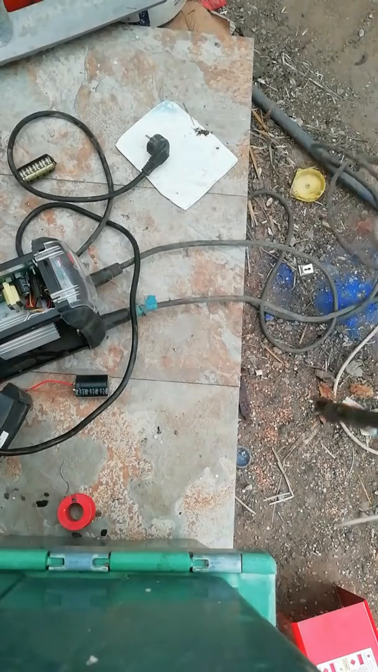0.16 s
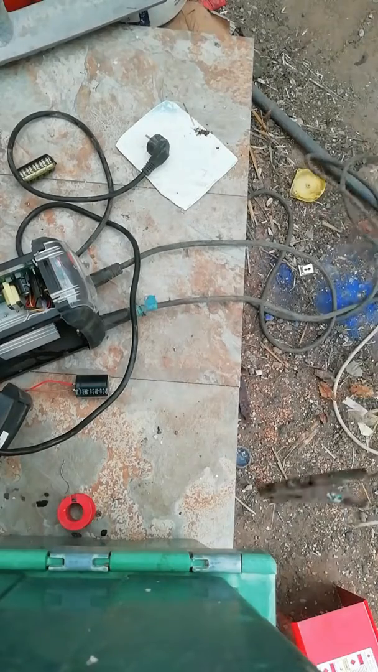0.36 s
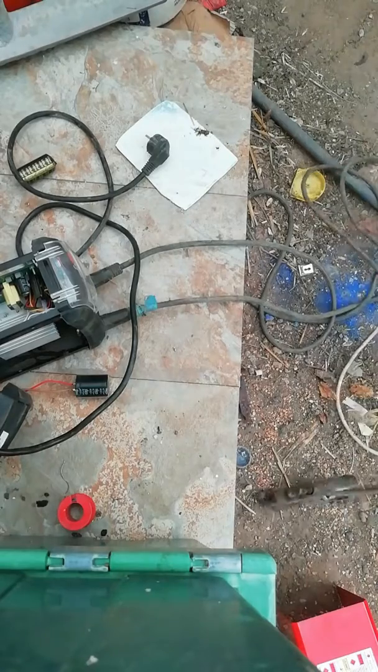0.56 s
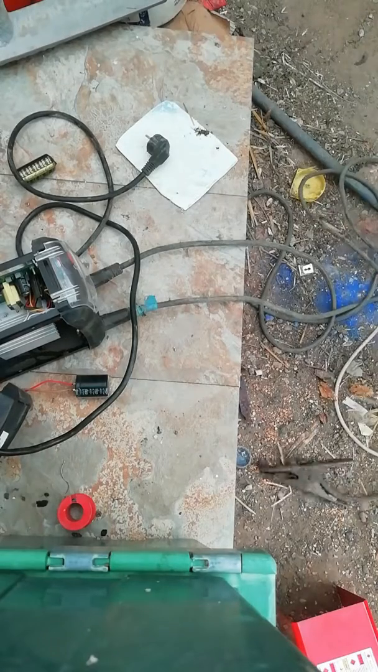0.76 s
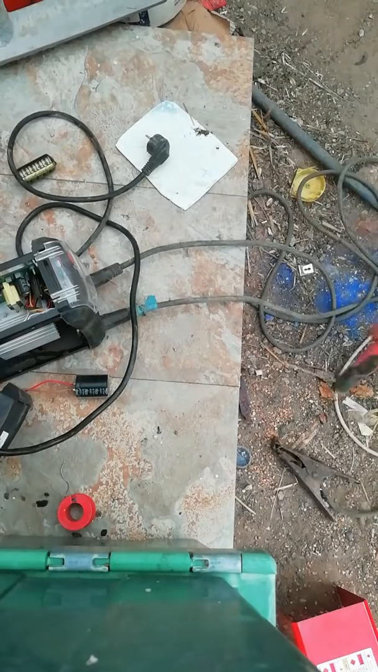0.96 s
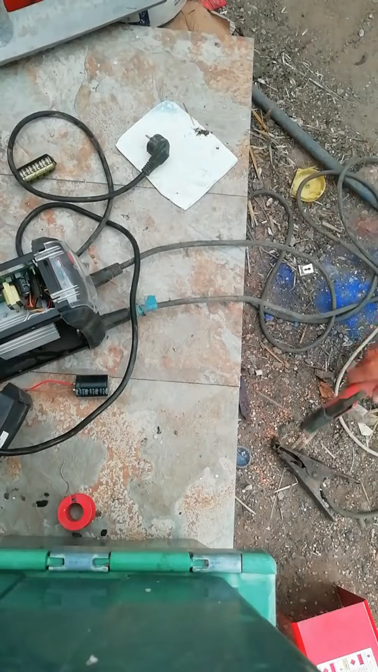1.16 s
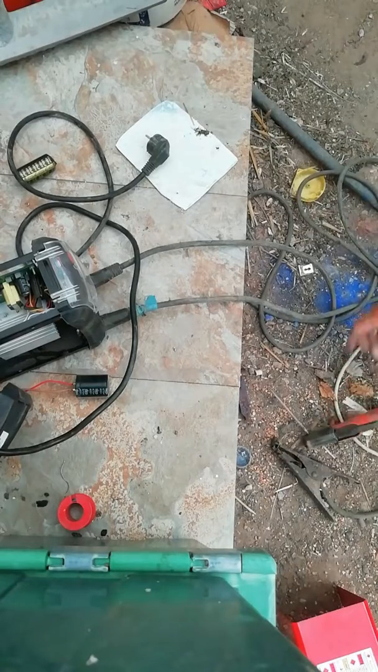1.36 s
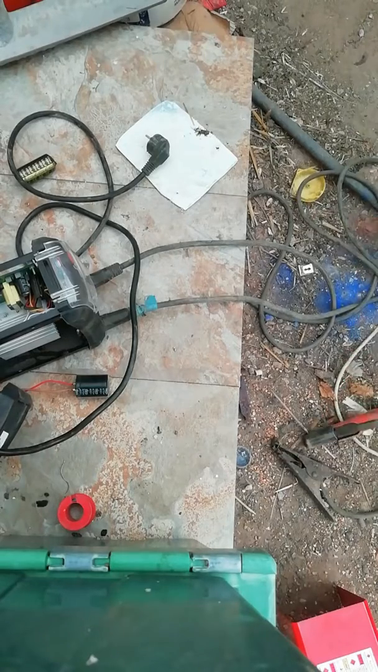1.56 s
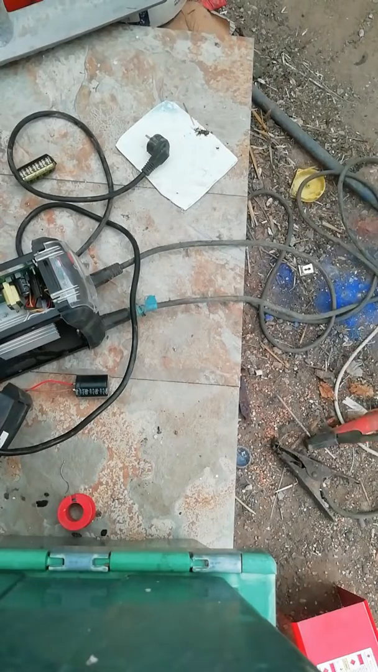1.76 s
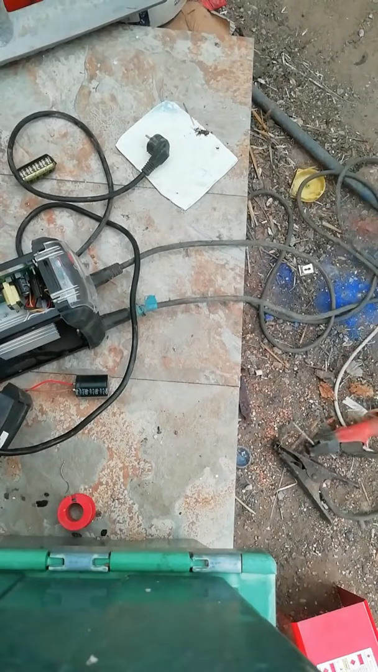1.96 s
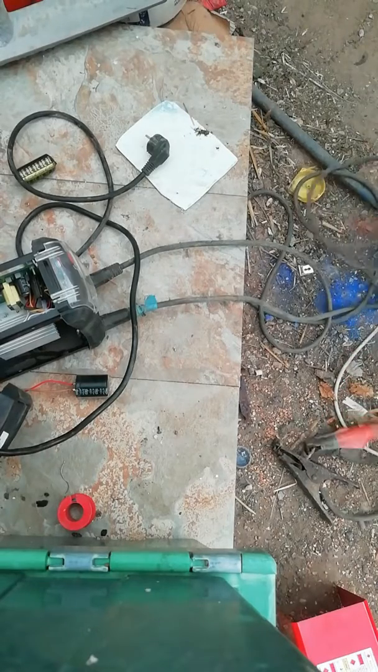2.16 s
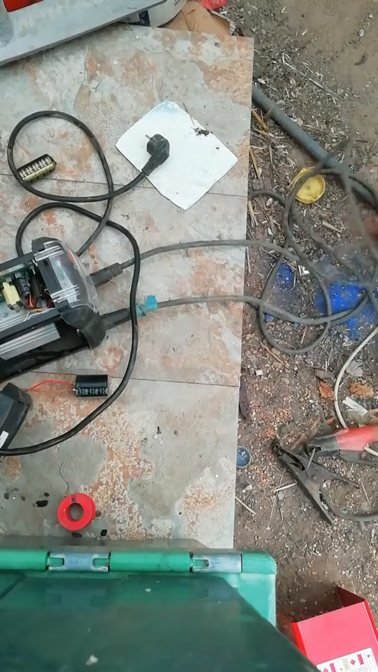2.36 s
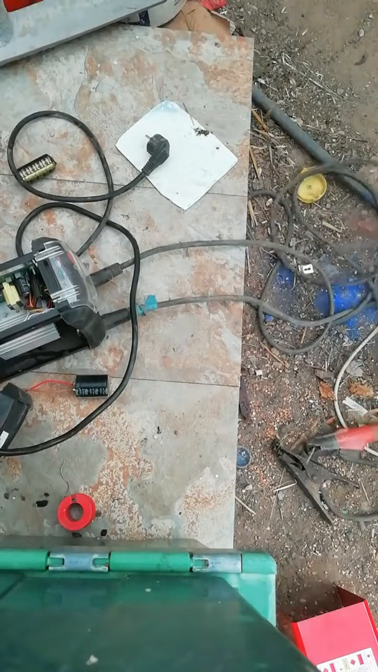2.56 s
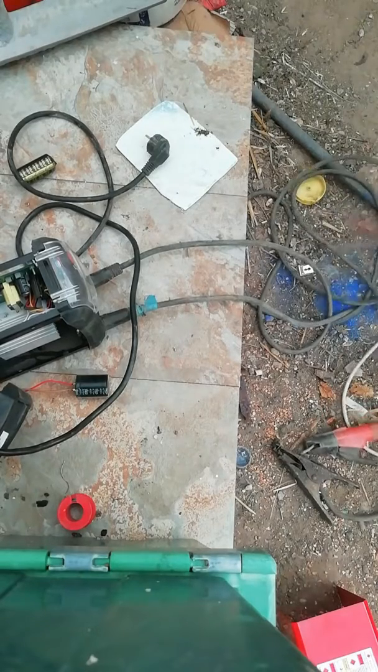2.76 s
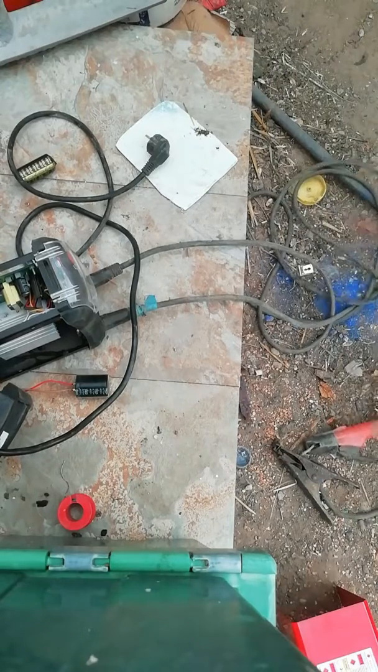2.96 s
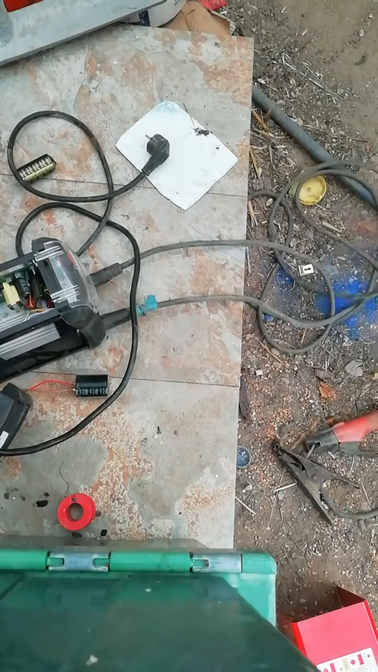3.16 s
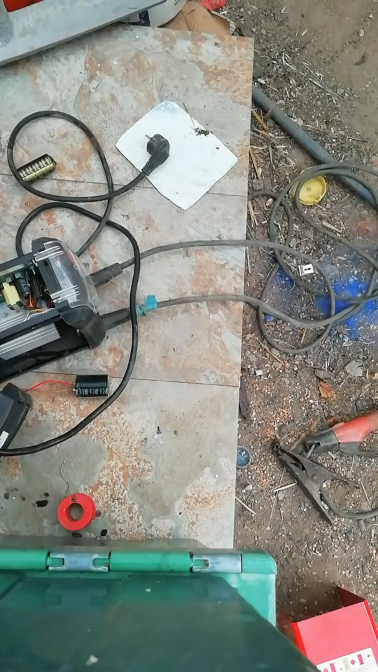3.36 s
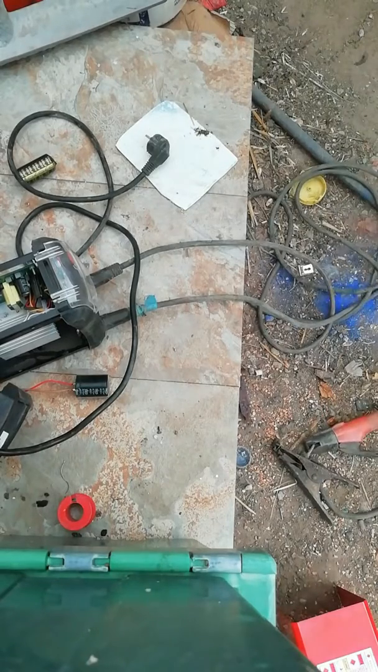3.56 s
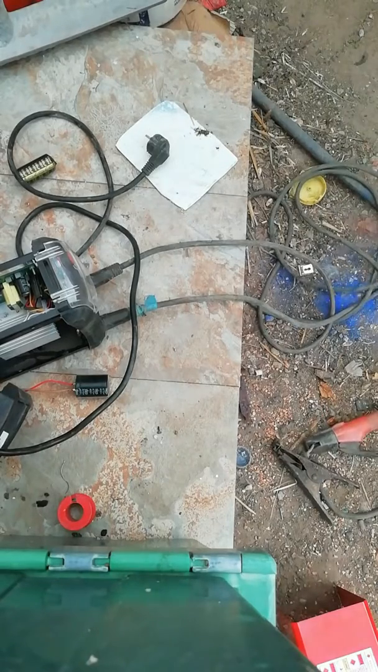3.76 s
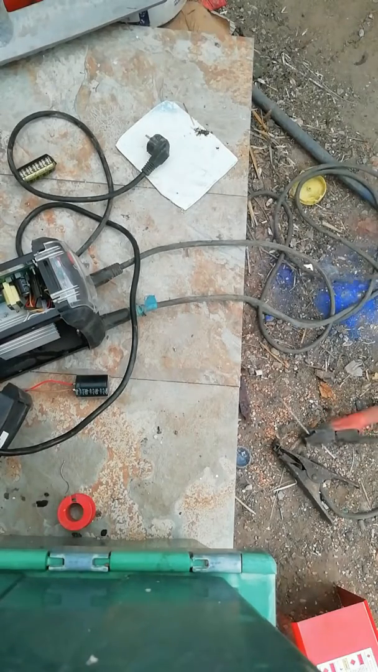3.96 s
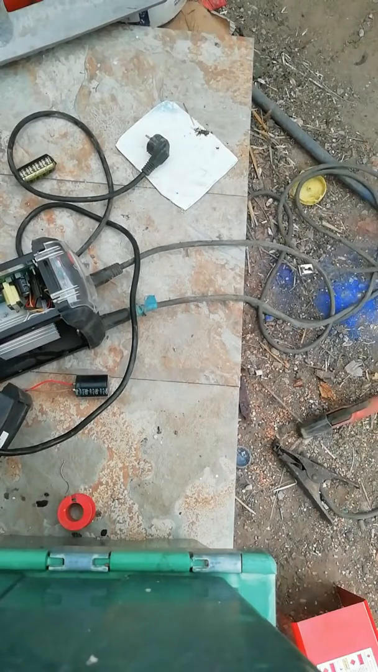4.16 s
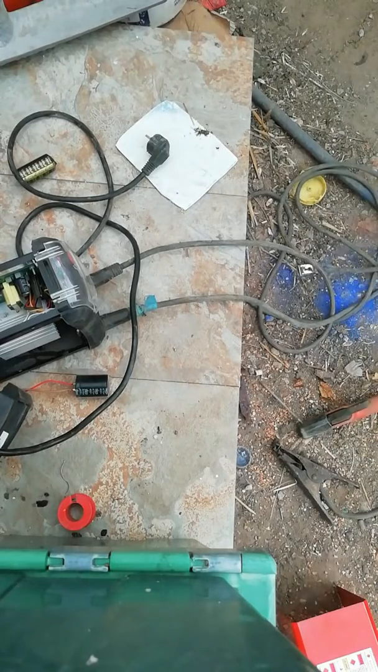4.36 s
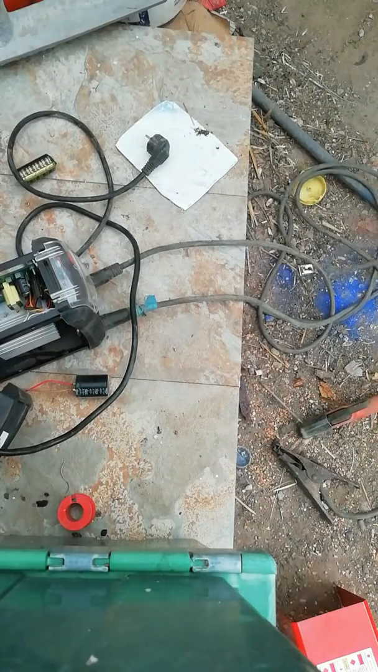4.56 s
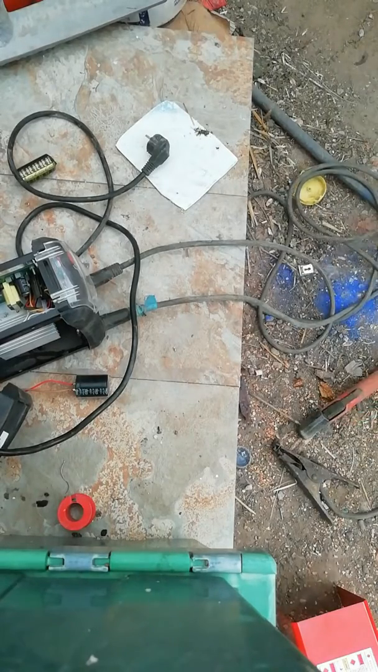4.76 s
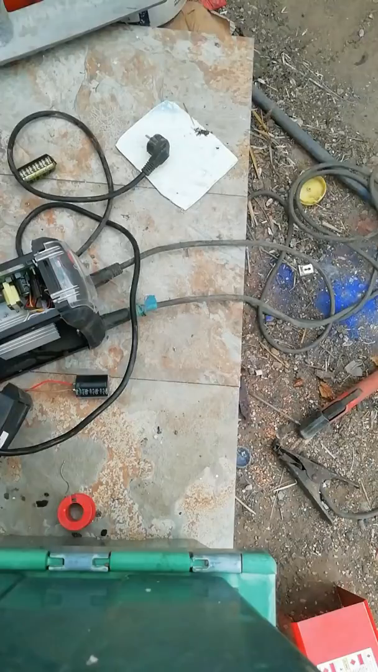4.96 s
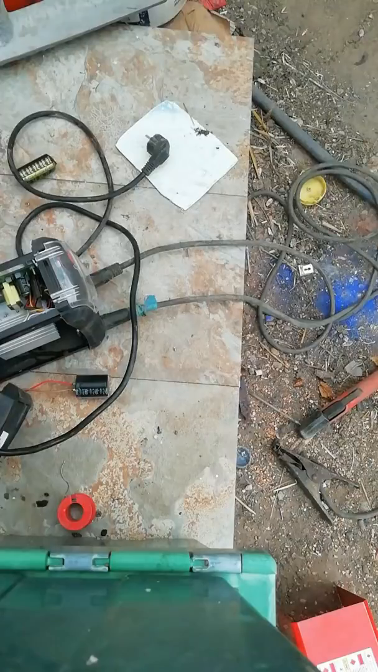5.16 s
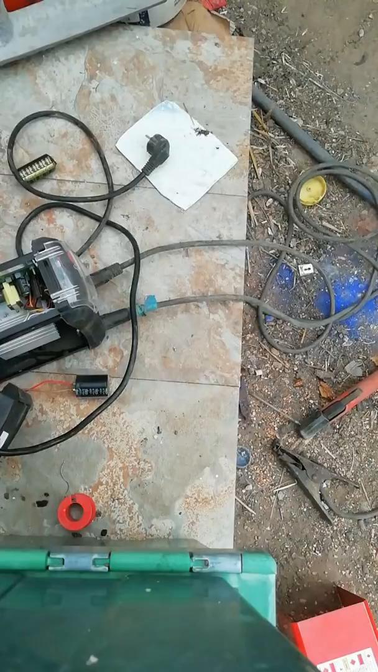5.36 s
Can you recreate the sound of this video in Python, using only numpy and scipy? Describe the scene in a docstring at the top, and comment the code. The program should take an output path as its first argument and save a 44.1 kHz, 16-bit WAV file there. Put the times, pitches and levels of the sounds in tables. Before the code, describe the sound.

A steel clamp drops and rattles on gritty ground, a metal tool knocks hard against it, then heavy cables scrape and thump over a distant engine hum.

```python
"""Throughout, a far engine hums in outdoor air: wavering tones in shaped noise.
A steel earth clamp drops on gritty ground and rattles: quick random taps ring its steel tones.
From about one second a bird chirps: gliding, breathy whistles. An electrode holder knocks on the clamp and bounces.
Then heavy cables are dragged and set down: coloured grains, squeaks, noisy knocks and low thumps.
Two microphone ports hear the handling: the left one earlier and brighter."""
import sys
import numpy as np
from scipy import signal
from scipy.fft import rfft, irfft, next_fast_len
from scipy.io import wavfile
from scipy.ndimage import uniform_filter1d

SR = 44100
rng = np.random.default_rng(int(sys.argv[2]) if len(sys.argv) > 2 else 0)


def transcribe(signal):
    """Save signal, clipped to [-1, 1], as a 16-bit WAV file at the path in sys.argv[1]."""
    frames = np.atleast_2d(signal).T
    limited = np.clip(frames, -1, 1)
    pcm = np.round(limited * 32767).astype(np.int16)
    wavfile.write(sys.argv[1], SR, pcm)


N = 238007  # length in samples

# Colour of the outdoor air, only the shape counts: pitch_hz, level_db (per Hz)
AIR_COLOUR = [(41, -41.5), (70, -8), (103, -16.5), (286, -17), (385, -20.5), (579, -19), (834, -23.5),
              (913, -20.5), (1730, -27.5), (3110, -29), (6590, -30.5), (8280, -24), (9930, -36.5),
              (14600, -41), (16000, -40.5)]
AIR_DB = -61.5  # overall level of the air
# How alike the air is at both ports: pitch_hz, likeness (-1 to 1)
AIR_LIKENESS = [(60, 0.82), (180, 1), (550, -0.64), (1650, -0.072), (4970, -0.061), (15000, -0.14)]
# Balance of the air between the ports: pitch_hz, left_over_right_db
AIR_BALANCE = [(60, 0.8), (150, -0.5), (380, 0.5), (950, -3.5), (2380, -0.58), (5980, -0.5), (15000, 0)]

# Path of the far engine: time_s, firing_hz, level_db
ENGINE_PATH = [(0.0, 54.16, -57.5), (2.06, 54.2, -59), (2.34, 54.76, -58), (4.42, 53.4, -58),
               (5.28, 53.3, -57), (5.4, 52.8, -58)]
# Wavering tones of a far machine: pitch_hz, level_db
MACHINE_TONES = [(129.2, -77.5), (263.8, -79), (328.4, -84), (393.0, -75), (457.6, -83.5), (915.2, -82.5),
                 (985.1, -87)]

# Bird chirps: start_s, length_s, first_hz, last_hz, level_db, peak_share (of the length before the loudest moment)
BIRD_CHIRPS = [(1.155, .075, 3120, 3116, -59, 0.43), (1.635, .05, 2780, 2890, -69, .5),
               (1.684, .06, 3010, 3114, -60.5, .6), (2.155, .1, 3030, 3070, -57.5, .6),
               (2.329, 0.057, 3060, 3135, -56, 0.46), (3.801, 0.073, 2444, 3010, -65.5, 0.21)]
CHIRP_ENDS_DB = -10.5  # both ends, relative to the loudest moment

# Squeaks, each a pair of fuzzy tones: start_s, length_s, low_first_hz, low_last_hz, high_first_hz, high_last_hz,
# level_db, peak_share (of the length before the loudest moment), end_db (relative to the loudest moment)
SQUEAK_PAIRS = [(0.361, 0.034, 1676, 1860, 2760, 2840, -46, .02, -32),
                (0.849, .085, 6250, 5900, 7250, 7250, -46.5, 0.19, -19),
                (1.156, 0.1, 6000, 5300, 7250, 7100, -49, 0.15, -12),
                (1.18, 0.03, 2000, 1984, 10840, 10650, -61.5, 0.45, -9),
                (2.59, 0.077, 3520, 3180, 6800, 6880, -41, .02, -37),
                (3.828, 0.11, 2440, 2870, 3150, 3200, -60.5, 0.24, -3),
                (3.971, 0.064, 7990, 7850, 8200, 8300, -57.5, 0.22, -10),
                (4.474, 0.13, 2040, 2370, 2760, 3340, -51.5, 0.25, -16)]
SQUEAK_START_DB = -11.5  # relative to the loudest moment

# Dull thumps on the ground: start_s, level_db, settled_pitch_hz, t60_s (time to fall 60 dB)
GROUND_THUMPS = [(0.507, -21, 460, 0.032), (.515, -32, 176, 0.16), (.53, -48, 341, 0.11),
                 (1.389, -51, 288, .1), (3.164, -36, 280, 0.043), (3.005, -42, 280, 0.038),
                 (3.22, -40, 306, 0.046), (2.251, -56, 370, 0.084), (0.519, -44, 116, 0.223),
                 (2.299, -43.5, 238, 0.088), (2.86, -41, 615, 0.13), (3.112, -33, 256, 0.037),
                 (4.158, -42, 460, .05), (4.17, -45, 250, 0.13), (4.29, -43, 330, .07),
                 (4.271, -38.5, 190.4, 0.17), (4.276, -42, 96, 0.23), (4.46, -47.5, 97, 0.18),
                 (4.683, -40, 217, 0.1), (5.091, -51, 77, 0.24)]

# Sharp knocks: start_s, crack_db, ring_over_crack_db, ring_hz, t60_s (time to fall 60 dB)
SHARP_KNOCKS = [(0.4714, -36.5, -1.5, 2970, 0.04), (0.5072, -33, 3.5, 3730, 0.02),
                (0.52, -42, -21, 4430, 0.011), (0.827, -52, -15, 4010, 0.02), (0.891, -43, -28, 920, 0.043),
                (0.9407, -48, -29, 1000, 0.029), (1.246, -24, -15, 2600, 0.03),
                (1.249, -17, -11.5, 3100, 0.024), (1.274, -36, -2.5, 2700, .03),
                (1.288, -37.5, -3, 3500, .025), (1.3533, -58, -4, 2540, 0.022),
                (1.375, -58, 4.5, 1190, 0.018), (1.408, -55.5, 5.5, 3200, 0.013),
                (1.7544, -67, 11, 900, 0.03), (1.8505, -64.5, 3, 1950, 0.029),
                (1.9083, -56, -5.5, 1290, 0.022), (2.1846, -49, -11, 2990, 0.016),
                (2.21, -62, 8, 1850, 0.033), (2.2607, -35.5, -22, 3120, 0.033),
                (2.5963, -39.5, -3.5, 1497, 0.024), (2.891, -46.5, 4, 1660, 0.024),
                (2.9328, -32, -14, 1480, 0.012), (2.9443, -30, -14, 3700, 0.018),
                (3.03, -38, -3, 1920, 0.022), (3.0644, -42, -17, 1730, 0.019),
                (3.0761, -35.5, -14, 1850, 0.024), (3.12, -42.5, -1, 1160, 0.02),
                (3.2445, -44, 0, 1950, 0.022), (3.248, -54.5, 13, 2700, 0.023),
                (3.3104, -62, 7, 1190, 0.037), (3.361, -68, 11.5, 1173, 0.027),
                (3.4994, -37.5, -0.5, 1720, 0.0069), (3.9469, -55.5, 3.5, 1200, 0.017),
                (3.9657, -48, 4.5, 2540, 0.017), (3.9974, -51, -7, 2660, 0.029),
                (4.103, -51.5, -20, 4000, 0.018), (4.117, -50, -5.5, 1150, 0.035),
                (4.145, -39, -4.5, 1240, 0.026), (4.1594, -42, 3.5, 1120, 0.031),
                (4.2238, -37, 6.5, 4150, 0.016), (4.2532, -42, -7, 2880, 0.036),
                (4.2667, -30, 4.5, 2410, 0.022), (4.372, -64, 10.5, 1980, .03),
                (4.4082, -52.5, 5.5, 2020, 0.056), (4.6786, -46, 10.5, 1030, 0.0095),
                (4.776, -41, -8.5, 1270, 0.017), (4.885, -65.5, 8.5, 1500, 0.021),
                (4.915, -51, -7, 918, 0.021), (4.945, -43.5, -10.5, 1595, 0.011),
                (4.9509, -57, 5, 1050, 0.026), (5.074, -65, 9.5, 1350, 0.047)]

# Colour of cracks and of hissing grit: pitch_hz, level_db (per Hz)
CRACK_COLOUR = [(2650, -28), (4500, -6), (4780, 0), (5190, -10.5), (6590, -5), (8250, 5.5), (8590, 2),
                (11000, -21), (14300, -59.5), (22000, -120)]
# Colour of scraping: pitch_hz, level_db (per Hz)
SCRAPE_COLOUR = [(470, -35), (800, 4.5), (1520, -2), (2270, -3), (2590, 2.5), (4320, -6), (5000, -3.5),
                 (6500, -18.5), (11000, -120)]
# Colour of low rumble: pitch_hz, level_db (per Hz)
RUMBLE_COLOUR = [(47, -29), (80, -11), (161, -17), (199, -9), (244, -8), (594, -7.5), (900, -16),
                 (1170, -61), (1980, -120)]
# Colour of the highest fizz: pitch_hz, level_db (per Hz)
FIZZ_COLOUR = [(6180, -29), (10500, -6), (13500, -7), (15300, -19.5), (16000, -16)]
# Strokes of cable and clamp over grit: full_level_s, rise_s, hold_s, fall_s, hiss_db,
# scrape_over_hiss_db, rumble_over_hiss_db, fizz_over_hiss_db
GRIT_STROKES = [(0.001, .01, .005, 0.21, -60, 3, -4, -29),
                (0.473, 0.0049, .003, 0.05, -40, -16, -12.5, -16),
                (0.508, 0.0018, 0.0083, .17, -31, -19, -9.5, -21),
                (0.646, 0.13, 0.013, 0.21, -66.5, 10.5, 5, -16),
                (0.864, 0.2, 0.027, 0.29, -59, -9, -7, -32), (1.271, .012, .002, 0.045, -45, -16, -11, -36),
                (1.315, .05, 0.022, 0.64, -59, 1, -5.5, -30), (1.858, .06, 0.053, 0.33, -71, 2, -4, -22),
                (2.184, 0.34, .01, 0.18, -63.5, 4, -8, -21),
                (2.267, 0.072, .003, 0.094, -51.5, -13, -8, -20),
                (2.597, 0.011, 0.0016, 0.017, -38.5, -27, -13.5, -33),
                (2.616, .02, .01, 0.12, -61.5, 3.5, -4.5, -20),
                (2.859, 0.099, 0.086, 0.17, -47.5, 0, -11, -15),
                (3.01, 0.056, .005, 0.14, -44, -3.5, -10, -10.5),
                (3.069, .06, 0.041, 0.19, -55.5, 2.5, 2.5, -11),
                (3.19, 0.12, 0.042, 0.046, -57, 7.5, 2.5, -29),
                (3.245, 0.082, .005, 0.1, -58, 10.5, 6.5, -17),
                (3.435, 0.021, 0.032, 0.078, -51, 2, -7, -29),
                (3.499, 0.068, 0.0042, 0.054, -56, 13, 5.5, -38),
                (3.96, 0.066, 0.016, 0.076, -55, -2, -26, -7), (4.158, 0.057, .005, 0.14, -47, 4, 1.5, -19),
                (4.223, .01, .04, 0.035, -49, 7, 2, -18), (4.266, 0.0041, 0.0023, 0.069, -35, 3, -5.5, -32),
                (4.294, .03, 0.0045, 0.079, -49.5, 6, 6, -26),
                (4.361, 0.026, 0.15, 0.23, -57.5, 3, -2, -13),
                (4.672, .025, 0.01, 0.33, -58.5, 1.5, 2, -24),
                (4.947, 0.2, .005, 0.068, -63.5, -0.5, 4, -36.5),
                (5.045, 0.17, 0.0044, .1, -62.5, -2, -0.5, -13.5),
                (5.09, 0.058, 0.035, 0.12, -70, 9.5, 7.5, -23),
                (5.184, 0.096, .005, 0.23, -57, -2, -14, -25)]
# Stretch of the fall times, one number each: hiss_times, scrape_times, rumble_times, fizz_times
FALL_STRETCH = [0.8, 0.91, 1.01, 0.73]
SWING_DB = 30  # rise and fall times are the time for this change in level

# Ringing tones of the electrode holder: pitch_hz, level_db, t60_s (time to fall 60 dB)
HOLDER_TONES = [(1405, -11.5, 0.036), (1997, -3, 0.031), (2100, -5.5, 0.036), (1020, -24, 0.015),
                (2480, 1, 0.08), (2730, 24.5, 0.0054), (2840, 1, .035), (3110, 3, 0.03), (3390, 2, 0.022),
                (3746, 6.5, 0.017), (4330, 2, 0.018), (4750, -4.5, 0.025), (6000, -2.5, 0.055),
                (6510, -0.5, 0.039), (6580, -18, 0.056), (7900, -8, 0.086), (8180, -4, .04),
                (8470, 3, 0.056), (8200, -11, 0.047), (9470, 2, 0.0098)]
TOUCH_S, TOUCH_DB, BLOW_S, BLOW_DB = 1.248, -35, 1.25, -18.5  # first touch, then the hard blow
BOUNCE_GAP_S, BOUNCE_STRETCH = .007, 1.15  # first gap; each next gap is this many times longer
BOUNCE_DB, BOUNCE_FADE_DB_PER_S = -42.5, 130  # bounce level counted from the blow, and its fade

# Ringing tones of the steel clamp: pitch_hz, level_db, t60_s (time to fall 60 dB)
CLAMP_TONES = [(1580, -32, 0.026), (2146, -7, 0.03), (2500, -4, 0.021), (3110, -4, 0.022),
               (3400, -14, 0.071), (4010, -9, 0.088), (4370, -10, 0.054), (4880, -3, 0.12),
               (5320, 1, 0.044), (5500, -11, 0.054), (5950, -9.5, 0.15), (6185, -10, 0.11),
               (7630, 0.5, 0.069), (7800, -24, 0.055), (8800, -20, 0.043), (9100, -12, 0.053),
               (9600, -12, 0.081)]
# Chatter of the jaws
RATTLE_S, RATTLE_DB, RATTLE_RISE_S, RATTLE_HOLD_S, RATTLE_FALL_S = .513, -41, .01, 0.039, 0.13
SETTLE_S, SETTLE_FALL_S = .62, 0.15  # the clamp comes to rest on the grit, which damps it

# Balance of the handling between the ports: pitch_hz, left_over_right_db
NEAR_BALANCE = [(100, 0), (400, -1), (700, 0), (1300, 5), (2400, 0), (4400, 4), (6500, 8), (8400, 13),
                (11000, 10), (15000, 9)]
# Share of the handling that reaches the right port straight: pitch_hz, share (0 to 1)
NEAR_STRAIGHT = [(100, 1), (500, .88), (1300, .8), (2500, .88), (4500, .6), (8000, .4)]
LAG_S = 25 / SR  # the right port hears this much later
EDGE_HZ = 15900  # upper band limit


def amp(db):
    """Turns decibels into a plain gain."""
    return 10 ** (np.asarray(db) / 20)


def evened(x):
    """Scales a sound to an average (RMS) strength of 1."""
    return x / np.sqrt(np.mean(x ** 2) + 1e-20)


def read(points, hz):
    """Reads a table between its points, on a logarithmic pitch scale."""
    f, value = np.transpose(points)
    return np.interp(np.log(hz + 1), np.log(f + 1), value)


def curves(rows):
    """Columns of a table at every sample that it spans."""
    s, *columns = np.transpose(rows)
    t = np.arange(s[0], s[-1], 1 / SR)
    return t, [np.interp(t, s, c) for c in columns]


def add(mix, s, sound):
    """Adds a sound at time s and cuts what runs past the end."""
    part = mix[round(s * SR):][:len(sound)]
    part += sound[:len(part)]


def colour(x, spectrum):
    """Causal filter that shapes the spectrum and passes white noise at gain 1."""
    hz = abs(np.fft.fftfreq(4096, 1 / SR))
    log_gain = np.log(amp(np.maximum(read(spectrum, hz), -80)))
    # the Hilbert transform gives the phase that puts the energy as early as possible
    taps = np.fft.ifft(np.exp(np.conj(signal.hilbert(log_gain)))).real[:2048]
    return signal.oaconvolve(x, taps / np.linalg.norm(taps))[:len(x)]


def resonate(x, hz, width):
    """Resonance at a fixed or gliding pitch: shifts it down to zero, smooths, and shifts back."""
    turn = np.exp(2j * np.pi * np.cumsum(hz * np.ones(len(x))) / SR)
    r = np.exp(-np.pi * width / SR)
    return 2 * (turn * signal.lfilter([1 - r], [1, -r], x / turn + 1e-18)).real


def resonate_twice(x, hz, width):
    """Two equal resonances in a row have steeper sides."""
    return resonate(resonate(x, hz, width), hz, width)


def ring(modes, strikes):
    """Each row of strikes sets one dying tone going; the contact lasts under a millisecond."""
    t = np.arange(SR // 2) / SR
    contact = np.sin(np.pi / 2 * np.minimum(t / .0009, 1)) ** 2
    out = 0
    for hit, (hz, db, t60) in zip(strikes, modes):
        tone = contact * amp(db - 60 * t / t60) * np.sin(2 * np.pi * hz * t)
        out = out + signal.oaconvolve(hit, tone)[:len(hit)]
    return out


def buzzed(x, rough, smooth_s):
    """Loose contact shakes the level of a ringing part, which widens its lines."""
    window = np.hanning(round(smooth_s * SR) + 3)
    shake = evened(signal.oaconvolve(rng.standard_normal(len(x)), window, "same"))
    return x * (np.sqrt(1 - rough ** 2) + rough * shake)


def swell(full_s, rise_s, hold_s, fall_s):
    """Gain over the whole scene: straight in dB up to full level, a hold, straight down again."""
    t = np.arange(N) / SR - full_s
    under = np.maximum(np.maximum(-t / rise_s, (t - hold_s) / fall_s), 0)
    return amp(-SWING_DB * under)


def scatter(t60):
    """Two dying trains of random reflections, each with energy 1."""
    t = np.arange(SR // 2) / SR
    present = rng.random((2, len(t))) < .1
    taps = rng.standard_normal((2, len(t))) * present * amp(-60 * t / t60)
    return taps / np.linalg.norm(taps, axis=1, keepdims=True)


def air():
    """Outdoor wash: random short-time spectra with drifting patches."""
    frames, hz = N // 256 + 5, np.fft.rfftfreq(1024, 1 / SR)
    a, b, c, d, patches = rng.standard_normal((frames, 513, 5)).T
    patches = uniform_filter1d(uniform_filter1d(patches, size=12, axis=0), size=14, axis=1)
    same = read(AIR_LIKENESS, hz)[:, None]
    tilt = amp(read(AIR_BALANCE, hz)[:, None] / 2)
    left = a + 1j * b
    right = same * left + np.sqrt(1 - same ** 2) * (c + 1j * d)
    z = np.array([left * tilt, right / tilt])
    z *= amp(read(AIR_COLOUR, hz)[:, None] + 2.5 * evened(patches))
    return amp(AIR_DB) * evened(signal.istft(z, nperseg=1024, noverlap=768)[1][:, :N])


def engine():
    """Firing tone with a half-speed tone and low rumble, and wavering machine tones."""
    t, (hz, db) = curves(ENGINE_PATH)
    turns = np.cumsum(hz) / SR

    def waver():
        """Slow random level changes."""
        return amp(3.62 * evened(uniform_filter1d(rng.standard_normal(len(t)), size=2500)))

    rumble = evened(resonate_twice(rng.standard_normal(len(t)), 48, 26))
    firing = 1.34 * waver() * np.sin(2 * np.pi * turns)
    half_speed = 0.59 * waver() * np.sin(np.pi * turns)
    sound = amp(db) * (firing + half_speed + 0.24 * rumble)
    for tone_hz, tone_db in MACHINE_TONES:
        sound += np.sqrt(2) * amp(tone_db) * waver() * np.sin(2 * np.pi * tone_hz * t)
    out = np.zeros(N)
    add(out, t[0], sound)
    return out


def bird():
    """Breathy, trilled whistles with a weak octave."""
    out = np.zeros(N)
    for s, length, first_hz, last_hz, db, top in BIRD_CHIRPS:
        t = np.arange(0, length, 1 / SR)
        hz = first_hz + (last_hz - first_hz) * t / length
        level_db = db + np.interp(t / length, [0, top, 1], [CHIRP_ENDS_DB, 0, CHIRP_ENDS_DB])
        turns = np.cumsum(hz) / SR
        breath = evened(resonate_twice(rng.standard_normal(len(t)), hz, 250))
        tone = np.sin(2 * np.pi * turns) + .13 * np.sin(4 * np.pi * turns) + .35 * breath
        trill = 1 + 0.36 * np.sin(2 * np.pi * 95 * t)
        add(out, s, np.sqrt(2) * amp(level_db) * tone * trill * signal.windows.tukey(len(t), .3))
    return out


def squeaks():
    """Rubbing noise in two narrow gliding resonances."""
    out = np.zeros(N)
    for s, length, low_hz, low_end_hz, high_hz, high_end_hz, db, top, end_db in SQUEAK_PAIRS:
        u = np.arange(0, 1, 1 / (length * SR))  # from 0 to 1 along the squeak
        rub = rng.standard_normal(len(u))
        glides = (low_hz + (low_end_hz - low_hz) * u, high_hz + (high_end_hz - high_hz) * u)
        tones = sum(resonate_twice(rub, hz, .09 * hz[0]) for hz in glides)
        level_db = db + np.interp(u, [0, top, 1], [SQUEAK_START_DB, 0, end_db])
        add(out, s, amp(level_db) * evened(tones) * signal.windows.tukey(len(u), .2))
    return out


def thumps():
    """Soft ground gives one low, sagging, quickly damped tone."""
    out, t = np.zeros(N), np.arange(12000) / SR
    for s, db, hz, t60 in GROUND_THUMPS:
        turns = hz * (t + 0.0034 * (1 - np.exp(-t / 0.0286)))  # starts sharp and sags to hz
        add(out, s, amp(db - 60 * t / t60) * np.sin(2 * np.pi * turns) * np.minimum(t / 0.0064, 1))
    return out


def knocks():
    """A sharp tick and a short burst of noise crack and ring at one broad pitch."""
    crack, body, t = np.zeros(N), np.zeros(N), np.arange(8000) / SR
    for s, db, ring_db, hz, t60 in SHARP_KNOCKS:
        burst = rng.standard_normal(len(t)) * amp(db - 60 * t / t60) * np.minimum(t / .001, 1)
        burst[20] = 4 * amp(db)  # the tick
        add(crack, s, burst)
        ringing = 9 * resonate_twice(burst, hz, 420) + 1.3 * colour(burst, SCRAPE_COLOUR)
        add(body, s, amp(ring_db) * ringing)
    return colour(crack, CRACK_COLOUR) + amp(-25.5) * colour(crack, FIZZ_COLOUR) + body


def grit(count, per_s, spread_db, dust):
    """Sparse grains of uneven size in fine dust."""
    present = rng.random(count) < per_s / SR
    size = amp(spread_db * np.minimum(rng.exponential(1, count), 5)) * present
    grains = evened(size * rng.choice([-1, 1], count))
    return evened(grains + dust * rng.standard_normal(count))


def pressure():
    """How hard the grit is rubbed, as a gain for each of the four bands; strokes add in power."""
    step = 16  # samples per gain value
    t, power = np.arange(0, N + step, step) / SR, 0
    for s, rise_s, hold_s, fall_s, hiss_db, *over_db in GRIT_STROKES:
        fall = (t - s - hold_s) / (fall_s * np.array(FALL_STRETCH)[:, None])
        under = np.maximum(np.maximum((s - t) / rise_s, fall), 0)
        band_db = hiss_db + np.array([0] + over_db)[:, None]
        power = power + amp(band_db - SWING_DB * under) ** 2
    return np.repeat(np.sqrt(power), step, axis=1)[:, :N]


def mottled(x, patchy_db):
    """Random patches over time and pitch make the scraping uneven and gritty."""
    z = signal.stft(x, nperseg=256, noverlap=192)[2]
    patches = uniform_filter1d(rng.standard_normal(z.shape), size=3, axis=0)
    patches = evened(uniform_filter1d(patches, size=14, axis=1))
    return signal.istft(z * amp(patchy_db * patches), nperseg=256, noverlap=192)[1][:len(x)]


def drag():
    """The same grains hiss, scrape, rumble and fizz; they come in uneven clumps."""
    grains = grit(count=N, per_s=2000, spread_db=3.0, dust=0.853)
    clumps = amp(0.96 * evened(uniform_filter1d(rng.standard_normal((4, N)), size=600)))
    colours = (CRACK_COLOUR, SCRAPE_COLOUR, RUMBLE_COLOUR, FIZZ_COLOUR)
    bands = clumps * [colour(grains, spectrum) for spectrum in colours]
    return mottled((pressure() * bands).sum(0), patchy_db=3.0)


def holder():
    """A touch, one hard blow on the clamp and a few bounces, ever weaker and further apart, ring the holder."""
    after = np.cumsum(BOUNCE_GAP_S * BOUNCE_STRETCH ** np.arange(10))
    blows = [(TOUCH_S, TOUCH_DB), (BLOW_S, BLOW_DB)]
    blows += [(BLOW_S + s, BOUNCE_DB - BOUNCE_FADE_DB_PER_S * s) for s in after]
    strikes = np.zeros((len(HOLDER_TONES), 2 * SR))
    for s, db in blows:
        # each tone starts upward or downward at random
        strikes[:, round(s * SR)] = 0.89 * amp(db) * rng.choice([-1, 1], len(HOLDER_TONES))
    return np.pad(buzzed(ring(HOLDER_TONES, strikes), rough=.5, smooth_s=.004), (0, N - 2 * SR))


def clamp():
    """The loose jaws chatter in quick random taps while the clamp bounces, until the grit damps it."""
    gain = amp(RATTLE_DB) * swell(RATTLE_S, RATTLE_RISE_S, RATTLE_HOLD_S, RATTLE_FALL_S)[:SR]
    moments = rng.random(SR) < 1500 / SR  # about 1500 taps per second
    taps = moments * gain * rng.standard_normal((len(CLAMP_TONES), SR))
    rattle = buzzed(ring(CLAMP_TONES, taps), rough=0.31, smooth_s=0.0055)
    rest = swell(0, 1, SETTLE_S, SETTLE_FALL_S)
    return rest * np.pad(rattle, (0, N - SR))


def handling():
    """Everything that is moved or struck on the ground."""
    return squeaks() + thumps() + knocks() + drag() + holder() + clamp()


def ports(x, far_side, yard_db):
    """The right port hears x later and duller, mixed with the far side of the same objects; the yard adds a tail."""
    size = next_fast_len(N + SR)
    hz = np.fft.rfftfreq(size, 1 / SR)
    same, tilt = read(NEAR_STRAIGHT, hz), amp(read(NEAR_BALANCE, hz) / 2)
    x = rfft(x, size)
    far_side = rfft(far_side, size) * rfft(scatter(0.063)[0], size)
    later = np.exp(-2j * np.pi * hz * LAG_S)
    right = (same * x + np.sqrt(1 - same ** 2) * far_side) * later
    echoes = np.pad(scatter(0.21), ((0, 0), (400, 0)))  # the tail starts 400 samples late
    tail = amp(yard_db) * rfft(echoes, size) * x
    return irfft((np.array([x, right]) + tail) * [tilt, 1 / tilt], size)[:, :N]


def scene():
    """Air, engine and the echoing bird lie behind the handling; the bird is stronger on the right."""
    song = bird()
    echo = signal.fftconvolve(song[None], scatter(0.11), axes=1)[:, :N]
    far_bird = amp([[-3.0], [1.5]]) * (song + amp(-1) * echo)
    near = ports(handling(), handling(), yard_db=-12.5)  # two random versions: near and far side
    return air() + engine() + far_bird + near


def record(dry):
    """The loudest peak bends softly below full scale; then the band limit."""
    u = dry / .95
    bent = .95 * np.tanh(u + u ** 3 / 3)
    band_limit = signal.firwin(511, EDGE_HZ, window=("kaiser", 9), fs=SR)
    return signal.oaconvolve(bent, band_limit[None], "same")


dry = scene()
out = record(dry)
transcribe(out)
```